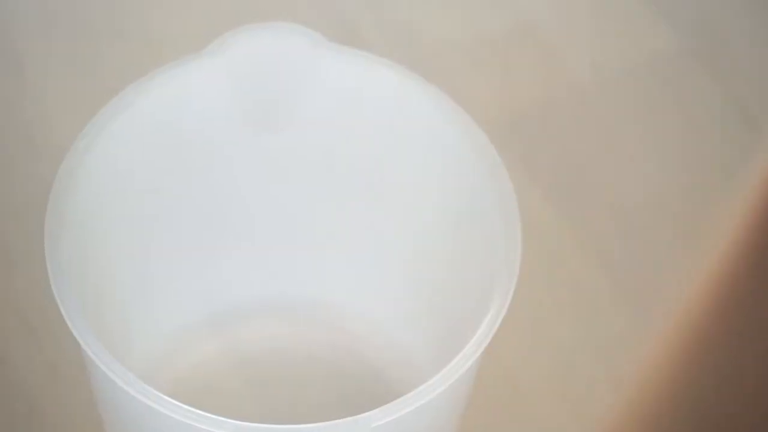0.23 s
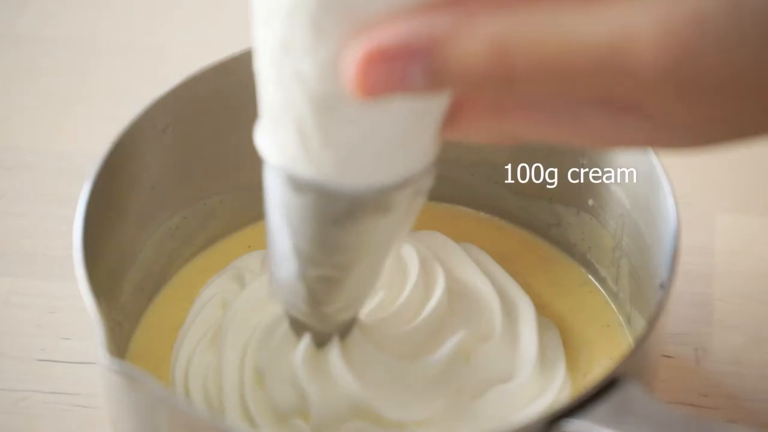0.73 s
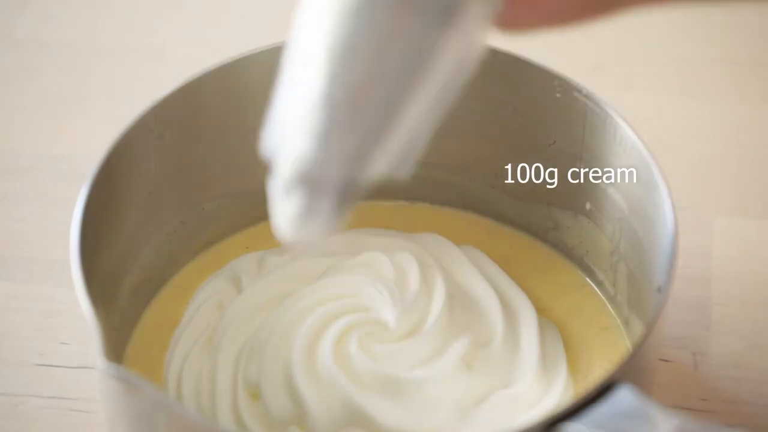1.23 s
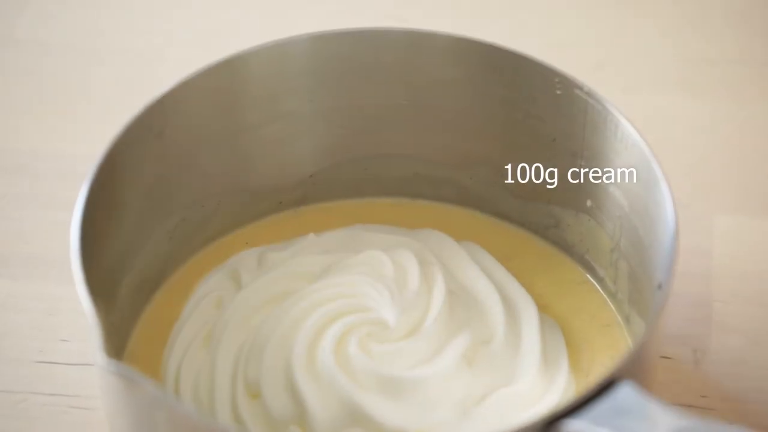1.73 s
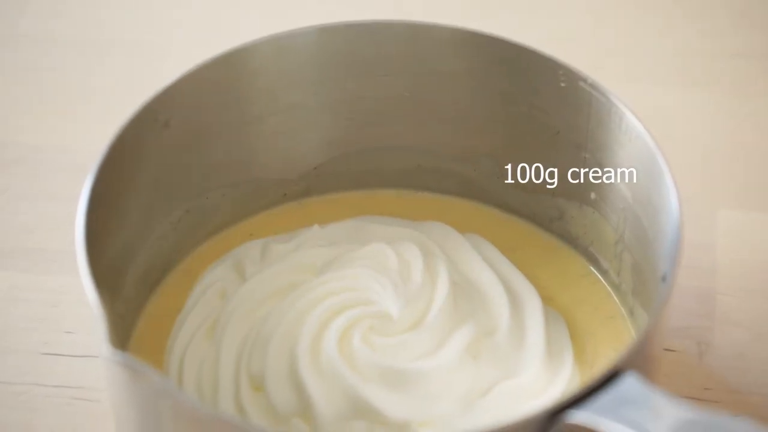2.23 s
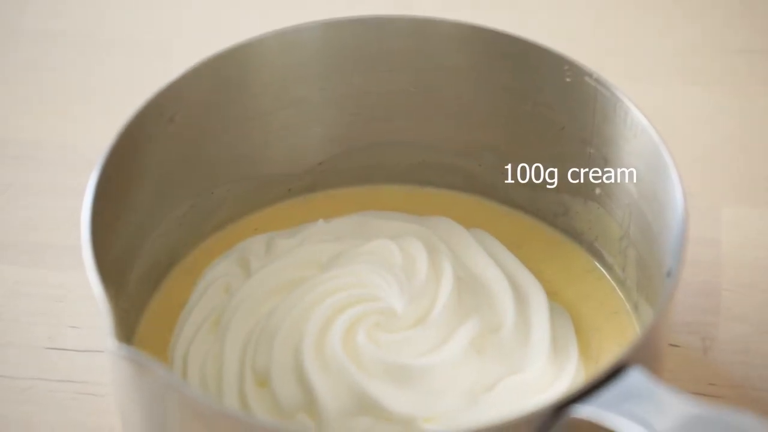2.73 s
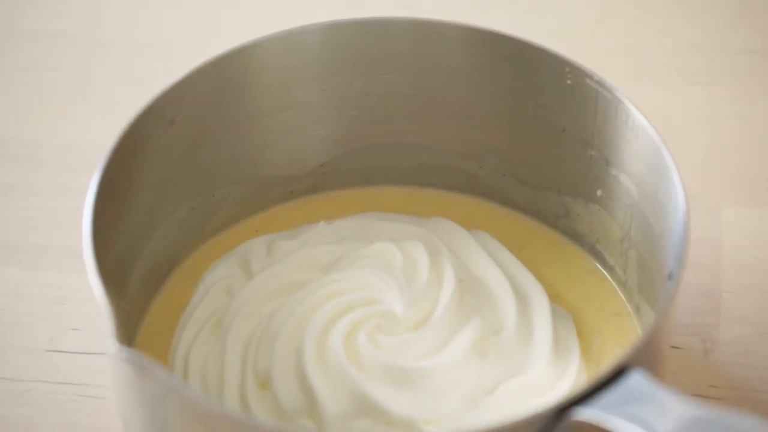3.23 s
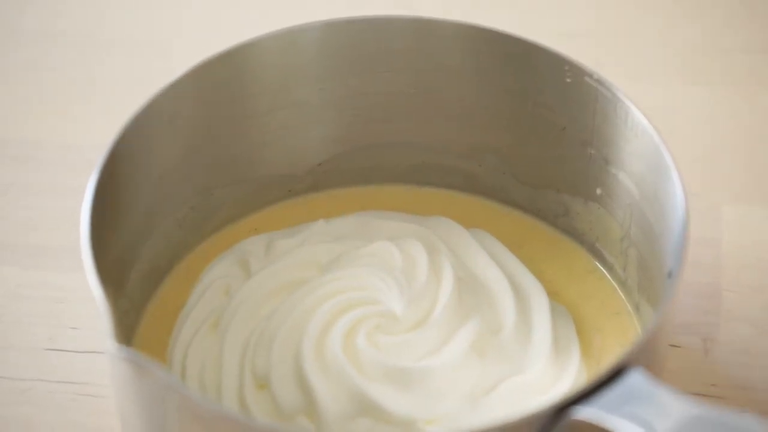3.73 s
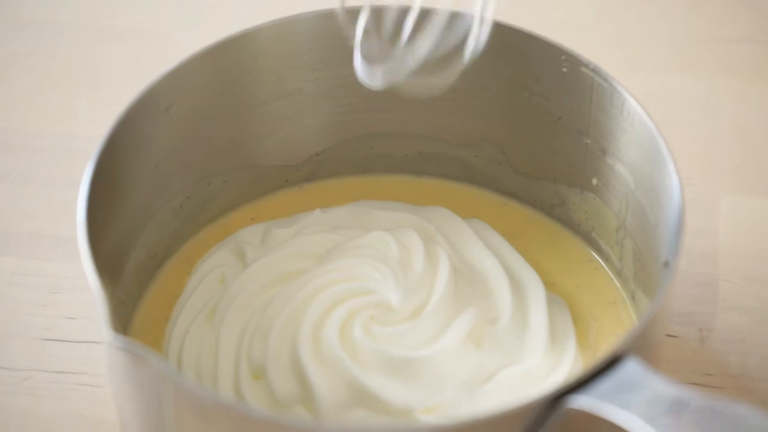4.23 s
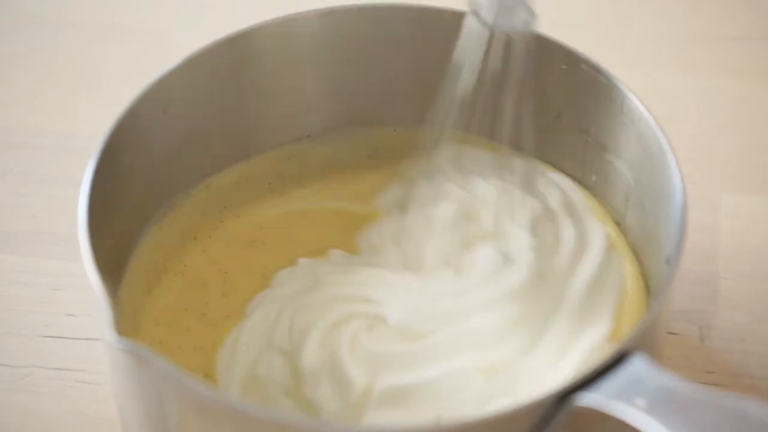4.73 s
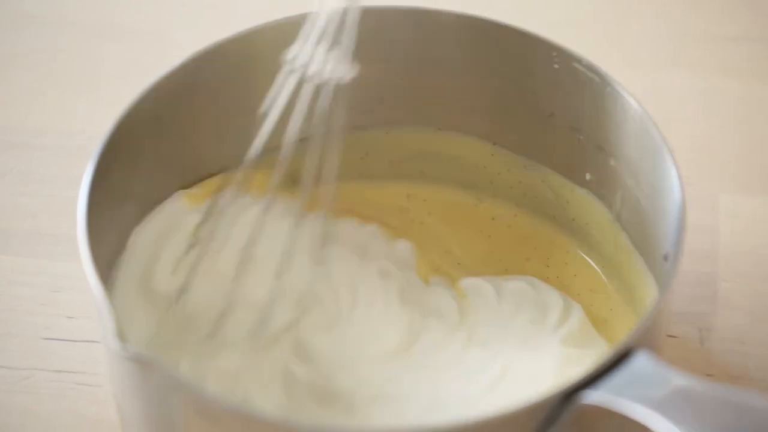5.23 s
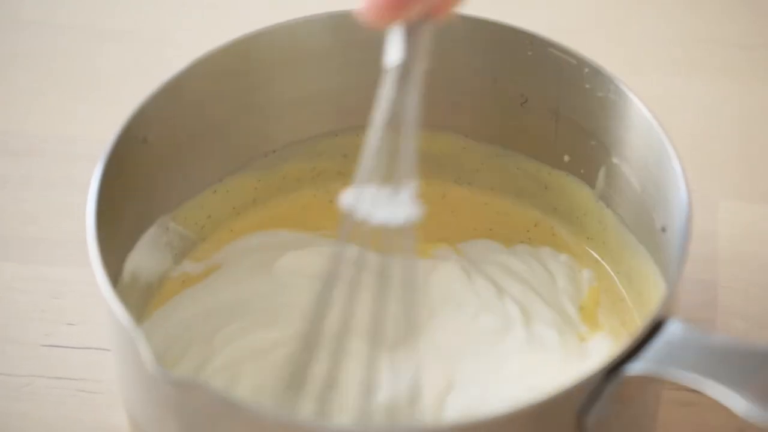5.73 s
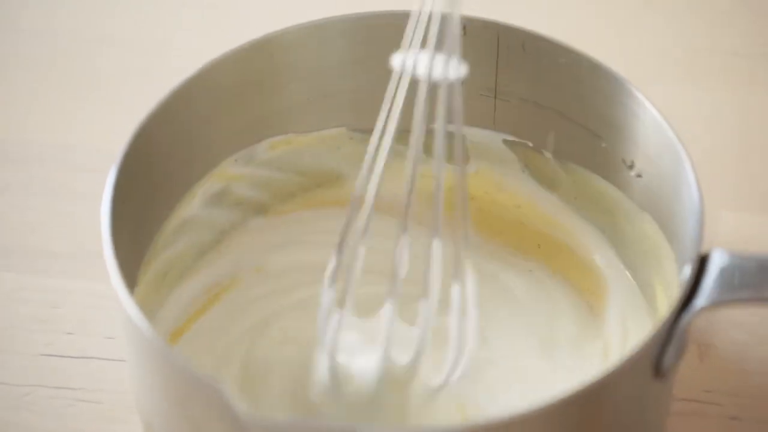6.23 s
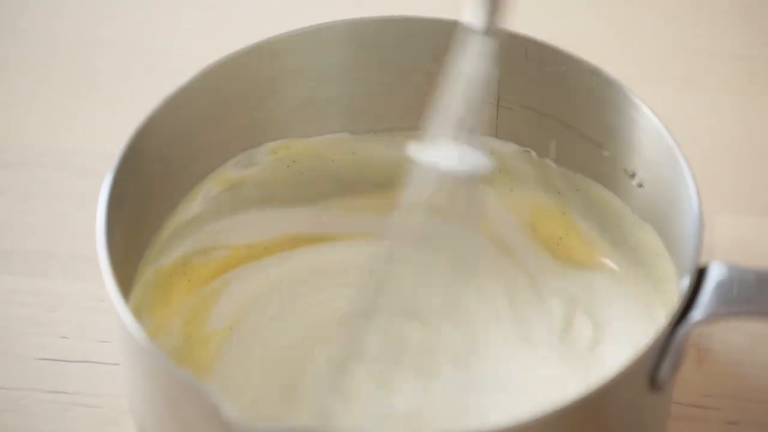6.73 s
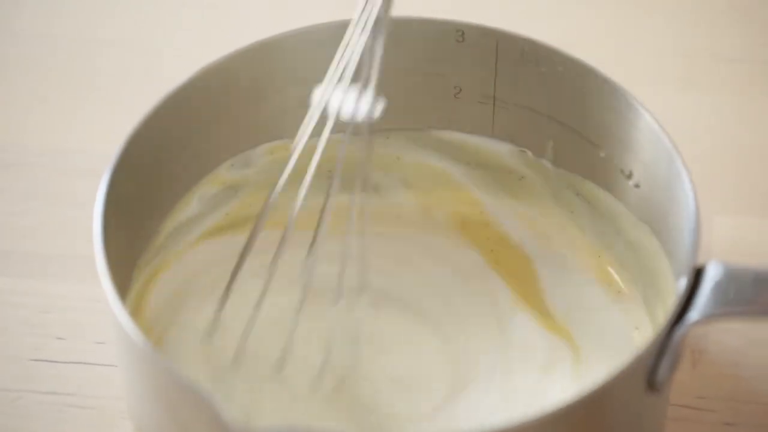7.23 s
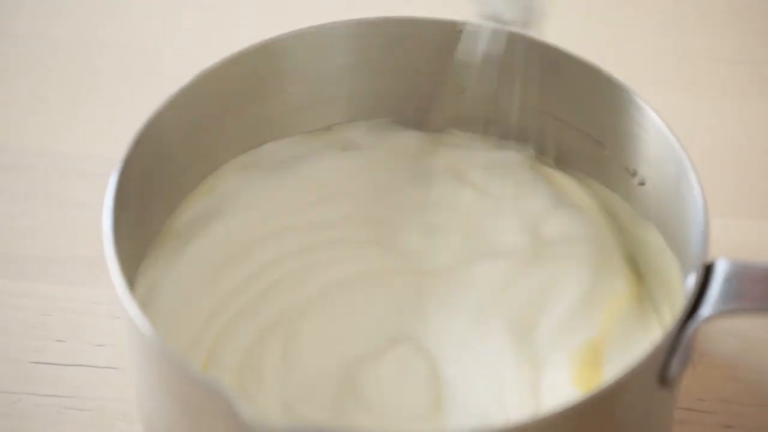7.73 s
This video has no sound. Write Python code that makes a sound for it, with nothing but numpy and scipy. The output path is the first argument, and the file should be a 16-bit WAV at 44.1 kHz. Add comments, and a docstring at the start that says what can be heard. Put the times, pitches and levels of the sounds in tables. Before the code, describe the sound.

A thin plastic piping bag crackles close to the microphone from the start, its creases snapping sharply; this is the loudest part. At about 0.6 seconds the close rustle cuts off, and softer, scattered crinkles continue further away. Between 2.7 and 3.3 seconds the bag is laid on a wooden counter, giving about four hollow knocks, and the crinkling dies away by 3.5 seconds. A pause follows, with only a faint tick. From 4.4 seconds a wire whisk goes round a steel saucepan of cream in about seven uneven strokes, coming a little faster later, until nearly 8 seconds. Each stroke taps the wall and scrapes along it, drawing a short, damped ring from the pan and a bright chatter from the wires. All sounds sit in the middle, in a small, quiet kitchen with a short echo and a soft, steady hush.

```python
"""In a small, quiet kitchen a plastic piping bag crackles close by as its creases snap.
From 0.6 s the crackle is further off. Around 3 s the bag is laid on a wooden counter,
which answers with hollow knocks. After a pause, from 4.4 s, a wire whisk goes round a steel
saucepan of cream: each stroke taps the wall, then scrapes along it, so pan and wires ring."""
import sys
import numpy as np
from scipy import signal
from scipy.fft import rfft, irfft
from scipy.io import wavfile
from scipy.ndimage import map_coordinates

SR = 44100
rng = np.random.default_rng(int(sys.argv[2]) if len(sys.argv) > 2 else 0)


def transcribe(u):
    """Save the signal u as a 16-bit wav file named by the first command-line argument.

    u: samples, shape (n,) or (channels, n), limited to [-1, 1]; the rate is SR.
    q: integer samples, one column per channel.
    """
    v = np.clip(np.atleast_2d(u).T, -1, 1)
    q = np.round(v * 32767).astype(np.int16)
    wavfile.write(sys.argv[1], SR, q)


N = 352800


def amp(db):
    """Turn decibels into a number to multiply by."""
    return 10 ** (np.asarray(db) / 20)

def unit(x):
    """Scale a signal to an average power of 1."""
    return x / np.sqrt(np.mean(x ** 2) + 1e-20)

def band(x, low_hz, high_hz):
    """Keep the sound between two frequencies."""
    return signal.sosfilt(signal.butter(2, [low_hz, min(high_hz, SR / 2.2)], "band", fs=SR, output="sos"), x)

def at_hz(table, hz):
    """Look up a table at any frequency."""
    table_hz, values = np.transpose(table)
    return np.interp(np.log(hz), np.log(table_hz), values)

def coloured(x, spectrum):
    """Turn each frequency up or down as a table says."""
    return irfft(rfft(x) * amp(at_hz(spectrum, np.fft.rfftfreq(N, 1 / SR) + 1)), N)

def drift(per_s):
    """A random curve that heads for a new value per_s times a second."""
    count = int(N / SR * per_s) + 2
    return np.interp(np.arange(N), np.linspace(0, N, count), rng.standard_normal(count))

def ring(force, hz, fade_s):
    """One natural note of a struck object. A fade time is how long it takes to drop 60 dB."""
    decay, angle = amp(-60 / (fade_s * SR)), 2 * np.pi * hz / SR
    return signal.lfilter([.5, 0, -.5], [1, -2 * decay * np.cos(angle), decay * decay], force + 1e-18)

def grains(per_s, spread_db):
    """Random clicks of very uneven size."""
    sizes = amp(spread_db * np.minimum(rng.exponential(1, N), 4)) * rng.choice([-1, 1], N)
    return unit(sizes * (rng.random(N) < per_s / SR))

def blows(times, lengths_s):
    """Make a short noise burst for each hit; return a function that plays them at given strengths."""
    t = np.arange(1500) / SR
    bursts = rng.standard_normal((len(times), 1500)) * np.exp(-t / np.maximum(lengths_s, 5e-5)[:, None])
    bursts /= np.linalg.norm(bursts, axis=1, keepdims=True)
    at = (np.round(times * SR).astype(int)[:, None] + np.arange(1500)).ravel()
    return lambda gains: np.bincount(at, (gains[:, None] * bursts).ravel(), N)[:N]

def trail(times, db, fade_s):
    """Power that jumps at each event and dies away."""
    kicks = np.bincount(np.round(times * SR).astype(int), amp(2 * db), N)
    return signal.lfilter([1], [1, -amp(-120 / (fade_s * SR))], kicks + 1e-18)


# The room's background hush: (frequency [Hz], relative level [dB])
HUSH = [(12, -30), (20, -9), (91, -9), (177, -8), (271, -8), (555, -9.5), (634, -11), (744, -10.5),
        (920, -12.5), (2590, -19), (4660, -24), (10300, -29), (11500, -35.5), (15000, -73), (22000, -120)]
# How much of it differs between left and right: (frequency [Hz], level against the shared part [dB])
HUSH_WIDTH = [(25, -6), (100, -21.5), (300, -23.5), (1000, -21.5), (10000, -4)]

def room_tone(level_db=-65.5):
    """A soft, steady hush lies under everything, nearly the same in both ears."""
    shared, side = (coloured(rng.standard_normal(N), HUSH) for _ in range(2))
    return amp(level_db) / np.std(shared) * (shared + coloured(side, HUSH_WIDTH) * np.array([[1], [-1]]))


# The bag's loudest snaps: (time [s], middle level [dB], low level [dB], high level [dB], middle pitch [Hz])
BAG_SNAPS = [(0.0034, -35, -38.5, -44, 2090), (0.0287, -31, -43, -45, 2750),
             (0.0422, -23.5, -35.5, -35, 2840), (0.0505, -33, -31, -36, 1670),
             (0.0708, -26, -37, -36, 2470), (0.084, -16.5, -40, -35.5, 5060), (0.104, -20, -38, -31, 1600),
             (0.1438, -25, -37.5, -50, 2600), (0.1543, -34, -43, -48, 2320),
             (0.1749, -21.5, -40, -39.5, 2770), (0.194, -32, -42, -40, 2280),
             (0.2163, -23.5, -39.5, -37.5, 2080), (0.2439, -12.5, -22.5, -24.5, 3410),
             (0.2586, -20.5, -37, -32, 2900), (0.2728, -18, -23, -31.5, 2830),
             (0.2817, -23, -38, -40, 2930), (0.3014, -28, -40, -43, 1870), (0.3295, -14.5, -35, -31, 2830),
             (0.3404, -14, -30, -28.5, 3060), (0.3662, -15.5, -31, -28.5, 2280),
             (0.402, -21.5, -42, -32, 1600), (0.4059, -29, -32, -43, 2390), (0.4513, -18.5, -33, -38, 3230),
             (0.4811, -19.5, -33.5, -34, 5770), (0.5292, -21.5, -47, -40, 2900),
             (0.5372, -22, -29.5, -33, 2980), (0.5585, -15, -30, -23.5, 5770),
             (0.5802, -18, -39, -26, 2850), (0.6096, -35, -34, -55, 1600), (0.631, -52, -48, -70.5, 2090),
             (0.7258, -51, -58, -81, 1970), (0.9028, -39, -65, -58, 2100), (0.9288, -40, -64, -54, 3380),
             (0.9772, -40.5, -62, -55, 2870), (0.988, -46, -66, -51, 1750),
             (1.0899, -34.5, -49.5, -46, 5800), (1.107, -54, -55.5, -69, 1950),
             (1.1445, -43, -61, -55, 5390), (1.2424, -47.5, -65, -58.5, 1890),
             (1.3658, -33.5, -48, -53, 3530), (1.4234, -34, -58, -44, 5600), (1.431, -34, -59, -45, 3560),
             (1.4568, -39, -46.5, -43.5, 1670), (1.4831, -35, -54, -44, 2080),
             (1.5267, -38, -61, -46.5, 3160), (1.5682, -30, -41, -52.5, 2700),
             (1.6732, -27.5, -49, -36.5, 3620), (1.7315, -33, -53, -62, 3170),
             (1.7426, -29.5, -60, -60, 2220), (1.7838, -33.5, -62, -50, 2780),
             (1.7934, -36, -63, -58, 2730), (1.9783, -32, -64, -59, 3470), (1.9857, -36.5, -60, -55, 2480),
             (2.0138, -37.5, -66, -49, 3210), (2.0776, -35, -58, -50, 3510), (2.0956, -54, -53, -57, 2080),
             (2.1386, -37, -61, -49, 1710), (2.1809, -33.5, -50, -46, 2630),
             (2.1978, -35.5, -47, -55, 3050), (2.3104, -42, -53.5, -54, 1730),
             (2.3301, -36.5, -61, -51, 5000), (2.5405, -45, -51, -68, 2560), (2.5656, -40, -58, -61, 3140),
             (2.613, -37.5, -45.5, -68, 2230), (2.799, -40, -56, -64, 1960), (2.8396, -29, -48, -52, 2070),
             (2.9964, -34, -54, -57, 3080), (3.0405, -32, -60, -52, 5750), (3.1703, -39, -48.5, -53, 3210),
             (3.1854, -28, -49, -39.5, 1840), (3.9056, -58, -60.5, -62, 1600)]
# How hard the hands work the bag, one list for close and one for far: (time [s], level [dB])
BAG_RUSTLE = [
    [(0.0, -32), (0.12, -45.5), (0.24, -35.5), (0.45, -33.5), (0.61, -36.5)],
    [(0.62, -76), (0.86, -69), (0.92, -57), (1.05, -68), (1.33, -65), (1.45, -51.5), (1.65, -55.5),
     (1.9, -57), (1.99, -50.5), (2.2, -54), (2.25, -57), (2.34, -49), (2.43, -57.5), (2.57, -47.5),
     (2.67, -65.5), (2.85, -42), (3.0, -53), (3.15, -56.5), (3.45, -69.5)],
]
# The tone of the thin plastic: (frequency [Hz], relative level [dB])
PLASTIC_TONE = [(88, -45.5), (150, -19), (497, -0.5), (554, -15), (1210, 0), (3350, -5), (7040, -5.5),
                (9770, -24.5), (10900, -3), (11500, -16.5), (15000, -51), (22000, -120)]
CLOSE_ENDS_S = .617   # the close rustle is cut off, its echo with it

def bag():
    """Big creases snap in about a millisecond; swarms of tiny ones make the plastic ring briefly."""
    rustle_db = np.interp(np.arange(N) / SR, *np.vstack(BAG_RUSTLE).T)
    snaps = crease_snaps(rustle_db)
    return snaps + amp(-48.5) * tiny_creases(rustle_db) * (np.arange(N) < 3.45 * SR)

def crease_snaps(rustle_db, extra=220, pitch_width=1.36):
    """The listed snaps plus small random ones, each a burst of low, middle and high noise."""
    big_s, *big_db, big_hz = np.transpose(BAG_SNAPS)
    small_s = rng.uniform(0, 3.3, extra)
    scatter_db = 5.5 * rng.standard_normal((extra, 3))
    small_db = rustle_db[(small_s * SR).astype(int), None] + scatter_db - [9, 16, 16]
    times = np.r_[big_s, small_s]
    mid_db, low_db, high_db = np.c_[big_db, small_db.T]
    play = blows(times, .0008 * amp(3 * rng.standard_normal(len(times))))
    pitch_hz = np.r_[big_hz, np.exp(rng.uniform(*np.log([1820, 5580]), extra))]
    centres_hz = np.geomspace(1700, 5600, 8)
    nearest = np.abs(np.log(pitch_hz[:, None] / centres_hz)).argmin(axis=1)
    middle = 0
    for k, hz in enumerate(centres_hz):
        bursts = play(amp(mid_db + 31.5) * (nearest == k) * np.sqrt(300 / hz))
        middle += band(bursts, hz / pitch_width, hz * pitch_width)
    low = band(play(amp(low_db + 34)), 684, 2140)
    high = band(play(amp(high_db + 29.5)), 8200, 22000)
    air_puff = band(play(amp(low_db + 20.5)), 25, 210)
    return low + middle + high + air_puff

def tiny_creases(rustle_db, fade_s=.2):
    """Tiny creases crackle under the hands, settle after big snaps and are shaken loose by knocks."""
    snap_s, mid_db, _, high_db, _ = np.transpose(BAG_SNAPS)
    knock_s, knock_db = np.transpose(COUNTER_KNOCKS)[:2]
    close = snap_s < CLOSE_ENDS_S
    powers = []
    for settle_db, jolt_db in ((mid_db - 16, -17), (high_db - 5.5, -28)):   # below, then above 4 kHz
        settling = np.where(np.arange(N) < CLOSE_ENDS_S * SR,
                            trail(snap_s[close], settle_db[close], fade_s),
                            trail(snap_s[~close], settle_db[~close], fade_s))
        powers.append(amp(2 * rustle_db) + settling + trail(knock_s, knock_db + jolt_db, fade_s))
    clicks = grains(2500 * amp(6.5 * drift(50)), spread_db=2.5)
    note_of_click = rng.integers(0, 14, N)
    swarm = 0
    for k, hz in enumerate(np.geomspace(400, 10500, 14)):
        note = unit(ring(clicks * (note_of_click == k), hz, 9.4 / hz))
        swarm += note * amp(at_hz(PLASTIC_TONE, hz)) * np.sqrt(hz * powers[int(hz > 4000)])
    return swarm


# How long the kitchen echoes: (frequency [Hz], fade time [s])
ECHO_FADES = [(200, 0.37), (1000, 0.34), (4000, 0.31), (10000, 0.28)]

def kitchen_echo(x, nearby_fade_s=.028):
    """Sound bounces quickly off counter, pan and wall, then dies away around the room."""
    t, tail = np.arange(SR // 2) / SR, 0
    for low_hz in 100 * 2. ** np.arange(7):
        noise = band(rng.standard_normal((2, len(t))), low_hz, 2 * low_hz)
        tail += noise * amp(-60 * t / at_hz(ECHO_FADES, low_hz * np.sqrt(2))) * (t > .004)
    nearby = band(rng.standard_normal((2, len(t))), 900, 16000) * amp(-60 * t / nearby_fade_s) * (t > .001)
    shared, side = amp(-11.5) * tail / np.linalg.norm(tail[0]) + amp(-8.5) * nearby / np.linalg.norm(nearby[0])
    side = amp(-26.5) * band(side, 2500, 14000) + amp(-37) * side
    echo = shared + side * np.array([[1], [-1]])
    close = np.arange(N) < CLOSE_ENDS_S * SR
    early, later = (signal.fftconvolve((x * part)[None], echo)[:, :N] for part in (close, ~close))
    return early * close + later


# The bag meeting the counter: (time [s], level [dB], hardness [dB], weight [dB], push length [s])
COUNTER_KNOCKS = [(2.684, -21.5, -12.5, -7, 0.00092), (2.849, -20.5, -8.5, -23, 0.00082),
                  (2.869, -15, -7, -5, 0.00064), (3.261, -24, -7.5, -6.5, 0.00072)]
# The hollow counter's natural notes: (pitch [Hz], level [dB], fade time [s])
COUNTER_NOTES = [(158.5, -26.5, 0.25), (273, -36, 0.057), (440, 3, 0.047), (499, -3.5, 0.029),
                 (553, 0, 0.026), (704, -6.5, 0.031), (760, -9, 0.024), (1300, -2.5, 0.023),
                 (1485, -1, 0.021), (1870, -1, 0.012), (2090, -5, 0.022), (2600, -6, 0.0066),
                 (3480, -8, 0.0091), (5500, -2, 0.0076)]

def counter():
    """The hand's push sounds the low notes, weight the lowest; a hard edge clicks the high ones."""
    times, level_db, hard_db, weight_db, push_s = np.transpose(COUNTER_KNOCKS)
    steps = np.arange(200)
    at = (np.round(times * SR).astype(int)[:, None] + steps).ravel()
    push = np.sin(np.pi * np.clip(steps / (push_s[:, None] * SR), 0, 1)) + 1e-9
    push /= push.sum(axis=1, keepdims=True)
    edge = steps == np.argmax(push, axis=1)[:, None]
    scatter_db = 3.46 * rng.standard_normal((len(times), len(COUNTER_NOTES)))
    wood = 0
    for k, (hz, db, fade_s) in enumerate(COUNTER_NOTES):
        strength_db = level_db + db + hard_db * (hz > 1000) + weight_db * (hz < 500) + scatter_db[:, k]
        hits = amp(strength_db)[:, None] * (edge if hz > 1000 else push)
        wood += ring(np.bincount(at, hits.ravel(), N), hz, fade_s) * (-1) ** k
    # a small panel gives off little bass
    return signal.sosfilt(signal.butter(4, 170, "high", fs=SR, output="sos"), wood)


# Whisk strokes along the pan wall:
# (first touch [s], hardest press [s], lift [s], pan body [dB], wire ring [dB], wire tips [dB])
WHISK_STROKES = [(4.421, 4.68, 4.78, -53, -66.5, -54.5), (5.148, 5.277, 5.4, -52, -74.5, -55.5),
                 (5.679, 5.937, 6.06, -53.5, -58, -50.5), (6.354, 6.59, 6.7, -51.5, -69, -55.5),
                 (6.85, 6.96, 7.07, -50.5, -66.5, -53.5), (7.128, 7.22, 7.26, -51.5, -74, -58),
                 (7.417, 7.704, 7.85, -53, -56, -47)]

def stroke_power(touch_db=-6.5, lift_db=-4.5, release_db_per_s=254):
    """Each stroke leans in, eases and lifts off; gives the power on pan body, wire ring and tips."""
    t, power = np.arange(N) / SR, 0
    for touch_s, hardest_s, lift_s, *db in WHISK_STROKES:
        press_db = np.interp(t, [touch_s, hardest_s, lift_s], [touch_db, 0, lift_db])
        press_db -= release_db_per_s * np.maximum(t - lift_s, 0)
        power += amp(2 * np.array(db))[:, None] * amp(2 * press_db) * (t > touch_s)
    return power


# When the whisk crosses the floor of the pan: (time [s])
FLOOR_CROSSINGS = [4.72, 5.31, 5.899, 6.579, 7.01, 7.56, 7.798]
# Pitches the whisk sounds best: (pitch at the wall [Hz], drop on the floor [fraction])
FAVOURED_PITCHES = [(1220, 0.31), (2450, .18)]

def contact_gain(hz, range_db=10, width=.14, half_crossing_s=.059):
    """At the wall the whisk brings out higher notes of the pan, across the floor lower ones."""
    t = np.arange(0, N, 64) / SR
    on_floor = np.minimum(sum(np.exp(-((t - s) / half_crossing_s) ** 2) for s in FLOOR_CROSSINGS), 1)
    closeness = sum(np.exp(-(np.log(hz / (wall_hz * (1 - drop * on_floor))) / width) ** 2)
                    for wall_hz, drop in FAVOURED_PITCHES)
    return amp(np.interp(np.arange(N) / SR, t, range_db * (closeness - .5)))


# Wires hitting the wall: (time [s], pan body [dB], wire ring [dB], wire tips [dB], low thump [dB])
WHISK_TAPS = [(4.428, -40.5, -36, -34, -51.5), (4.553, -47, -43, -41.5, -66), (4.685, -40.5, -69, -65, -69),
              (4.774, -45.5, -57, -41, -72), (4.858, -51, -72, -54.5, -70), (4.998, -53, -78, -79, -56.5),
              (5.128, -33.5, -56, -42, -54), (5.237, -46, -61, -53, -63), (5.352, -50, -57, -42.5, -76),
              (5.366, -47, -59, -40, -74), (5.377, -42.5, -58.5, -45, -71), (5.679, -38, -34, -36.5, -51.5),
              (5.743, -36.5, -47.5, -56, -49.5), (5.778, -59, -44, -52, -59), (5.83, -44, -45, -39.5, -63),
              (5.896, -45, -45, -41, -57), (5.927, -41, -42, -46, -55.5), (6.005, -30, -34.5, -34, -45.5),
              (6.069, -41.5, -52, -47, -54.5), (6.134, -46.5, -65, -57, -69), (6.346, -43, -37, -43, -61),
              (6.373, -29.5, -39.5, -40, -47), (6.604, -37, -61, -46.5, -66), (6.625, -37, -51, -31.5, -63),
              (6.638, -34, -36, -37, -55.5), (6.852, -26, -56, -43, -56.5), (6.956, -41.5, -48, -44.5, -67),
              (6.974, -47, -46, -45, -63), (7.074, -30, -38.5, -34, -60), (7.134, -35, -71, -61, -70),
              (7.193, -35, -67, -54, -59), (7.245, -43, -61, -47.5, -73), (7.418, -34, -29.5, -33, -57.5),
              (7.443, -27.5, -39.5, -35.5, -49), (7.511, -49, -55, -48, -62), (7.559, -44, -43, -43, -63),
              (7.578, -44, -45, -42, -55), (7.701, -40.5, -50, -38, -71), (7.769, -36, -50, -46, -70),
              (7.778, -45, -41, -40, -72), (7.794, -35, -41.5, -41, -76), (7.836, -39.5, -70, -60, -66)]
# Notes of the cream-damped pan, then of the wires; wider ones fade sooner:
# (pitch [Hz], width [Hz], level [dB])
STEEL_NOTES = [(262.6, 19, -15.5), (424, 33, -8), (607, 76, -5.5), (759, 49, -3), (989, 130, -3),
               (1208, 57.4, -5), (1500, 170, -3.5), (1745, 120, -4), (2004, 162, -5), (2353, 262, -3),
               (2930, 250, -5), (3440, 226, -4), (4000, 31, -33), (4510, 72, -26.5), (5236, 180, -5),
               (5660, 63, -6.5), (5916, 79, 3.5), (6146, 44, -5.5), (6637, 116, -2), (6776, 46, -10),
               (7150, 194, -6.5), (7990, 230, -2.5), (9010, 130, -9.5), (9270, 150, -11.5), (10280, 370, 4),
               (10400, 180, -12), (10780, 310, 3)]
# Noise of steel on steel, a row each for body, ring and tips: (low edge [Hz], high edge [Hz], level [dB])
CONTACT_NOISE = [(690, 6600, 17), (3140, 6200, -7), (7350, 27000, 10.5)]
TAP_DB, CHATTER_DB = (-5, 1.1, 3, 11), (-9.5, -14, -15, -7)   # body, ring, tips, thump
SLIDE_NOISE_DB = (-1, -1, -8)   # body, ring, tips

def whisk(first_tap_s=.0026, tap_s=.0041, chatter_fade_s=.15):
    """Tapping and sliding wires ring the same steel notes, and chatter on after each tap."""
    times, *tap_db = np.transpose(WHISK_TAPS)
    tap_db = [db + boost_db for db, boost_db in zip(tap_db, TAP_DB)]
    lengths_s = np.where(np.diff(times, prepend=0) > .2, first_tap_s, tap_s)   # crisper after a gap
    play = blows(times, lengths_s * amp(6 * rng.standard_normal(len(times))))
    taps = [play(amp(db)) for db in tap_db]
    friction = unit(grains(2500 * amp(5.9 * drift(30)), spread_db=4.6) + .43 * rng.standard_normal(N))
    slides = [friction * amp(-21) * np.sqrt(power + trail(times, db + chatter_db, chatter_fade_s))
              for power, db, chatter_db in zip(stroke_power()[[0, 1, 2, 0]], tap_db, CHATTER_DB)]
    steady, sliding_wires = 0, 0
    for k, (hz, width_hz, db) in enumerate(STEEL_NOTES):
        part = 3 if hz < 650 else np.searchsorted((3600, 7000), hz)   # 0 body, 1 ring, 2 tips, 3 thump
        is_wire = part in (1, 2)
        fade_s = np.log(1000) / (np.pi * width_hz)
        gain = amp(db) * (-1) ** k
        contact = 1 if is_wire else contact_gain(hz)
        steady += gain * ring(taps[part] * contact, hz, fade_s)
        flicker = amp((5 if is_wire else 3) * drift(18))
        scrape = gain * ring(slides[part] * contact * flicker, hz, fade_s)
        if is_wire:
            sliding_wires += scrape
        else:
            steady += scrape * amp(-9 * (hz < 900))   # sliding barely moves the lowest notes
    # wires bend and dip as they slide, so their pitches waver by a few percent
    shift = signal.lfilter([1], [1, -.9998], .025 * drift(16))
    steel = steady + map_coordinates(sliding_wires, [np.arange(N) + shift], order=3)
    for part, (low_hz, high_hz, db) in enumerate(CONTACT_NOISE):
        steel += amp(db) * band(taps[part] + amp(SLIDE_NOISE_DB[part]) * slides[part], low_hz, high_hz)
    return steel


def scene():
    """Bag, counter and whisk sit in the middle, with the room's echo and hush around them."""
    direct = bag() + counter() + whisk()
    return direct + kitchen_echo(direct) + room_tone()

def record(dry, top_hz=11030, cutoff_hz=11978):
    """The microphone loses treble steeply above its top and passes almost none beyond the cutoff."""
    dulled = signal.sosfilt(signal.cheby1(6, .5, top_hz, fs=SR, output="sos"), dry)
    return signal.sosfilt(signal.cheby2(12, 60, cutoff_hz, fs=SR, output="sos"), dulled)


dry = scene()
out = record(dry)
transcribe(out)
```